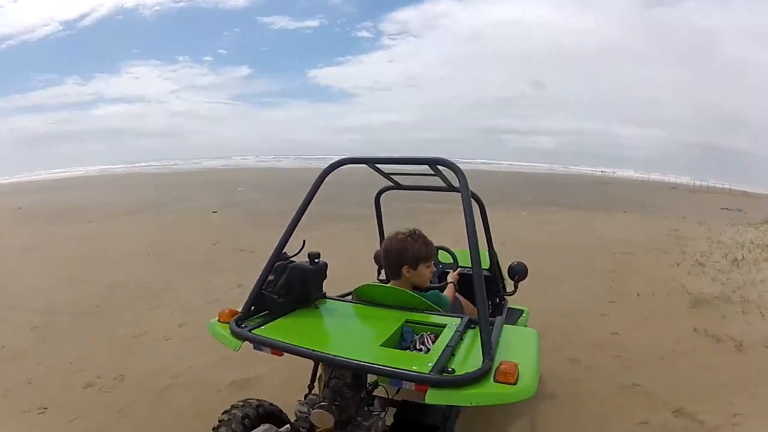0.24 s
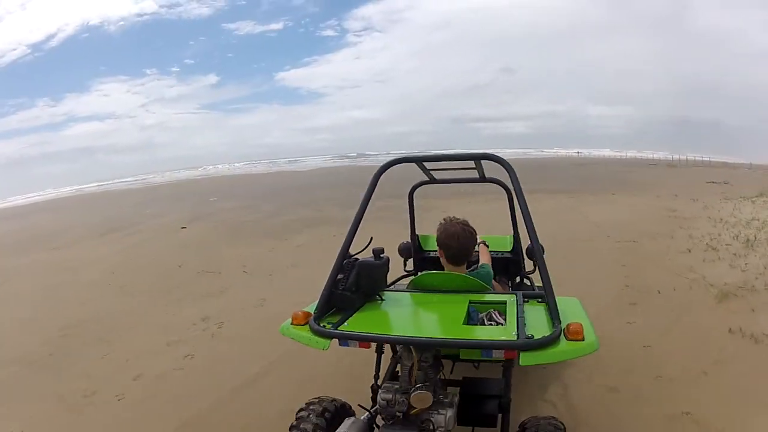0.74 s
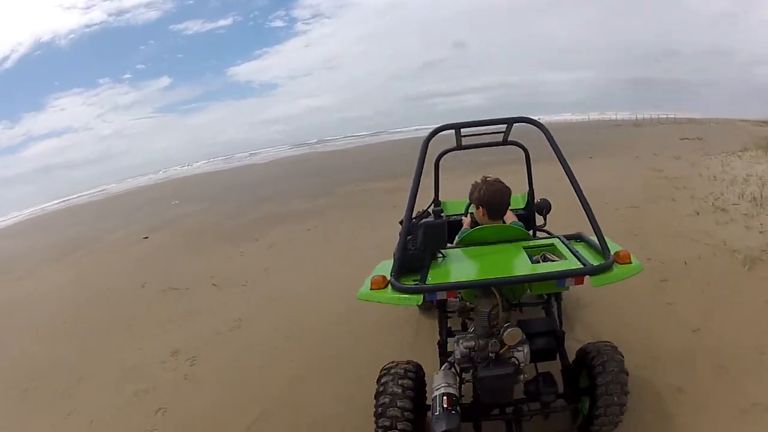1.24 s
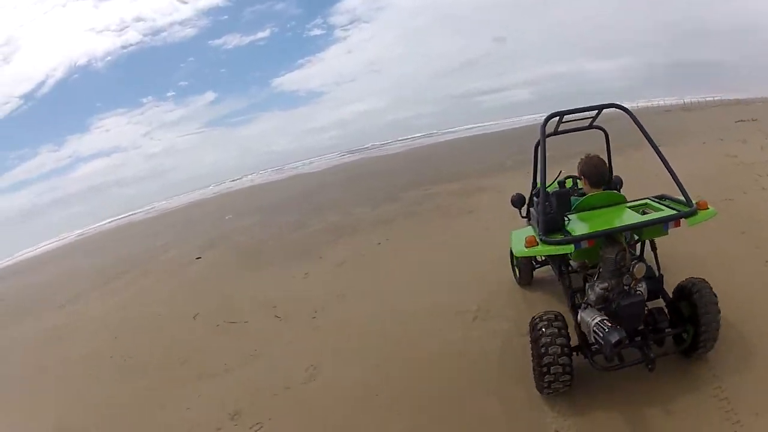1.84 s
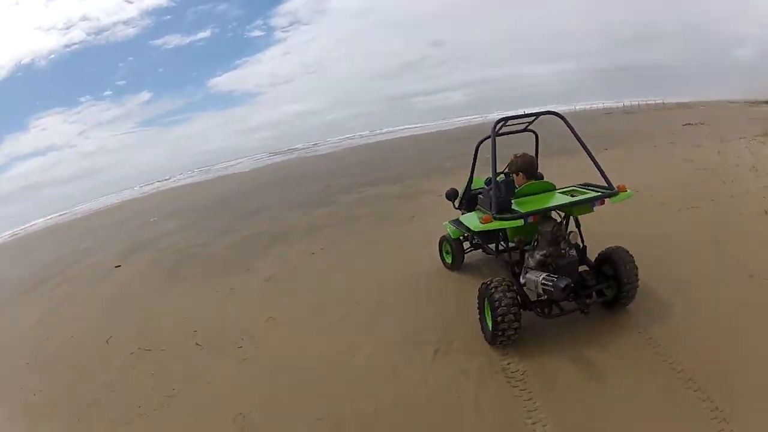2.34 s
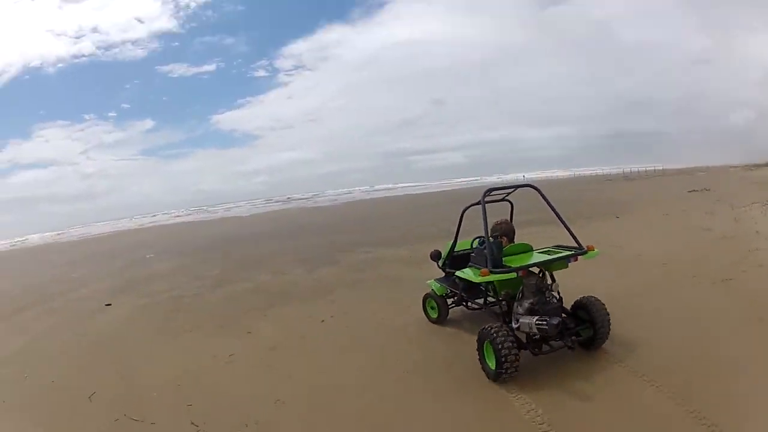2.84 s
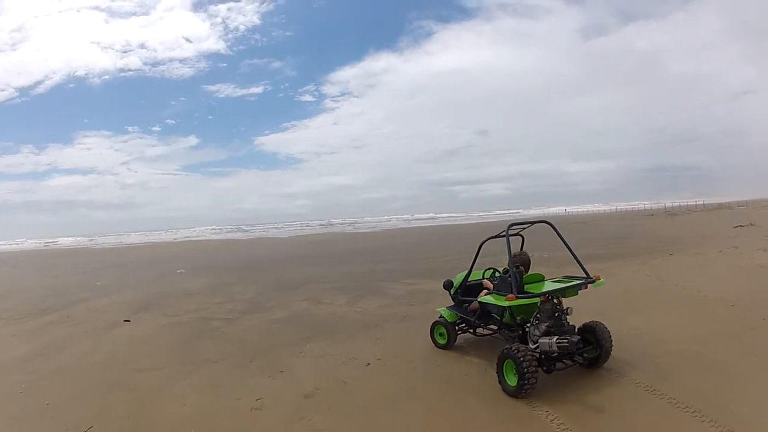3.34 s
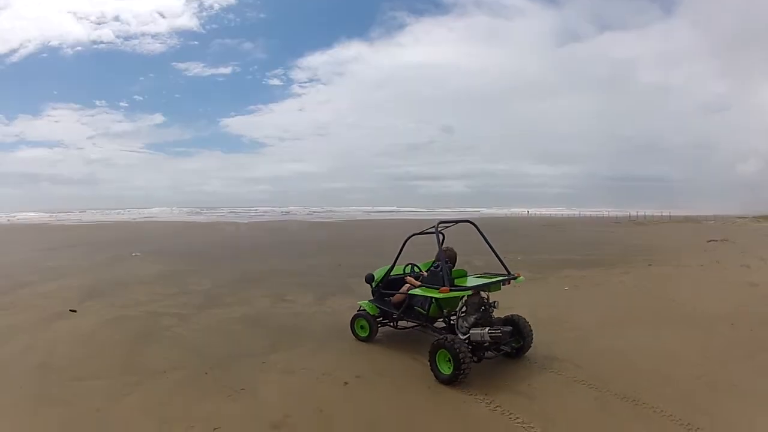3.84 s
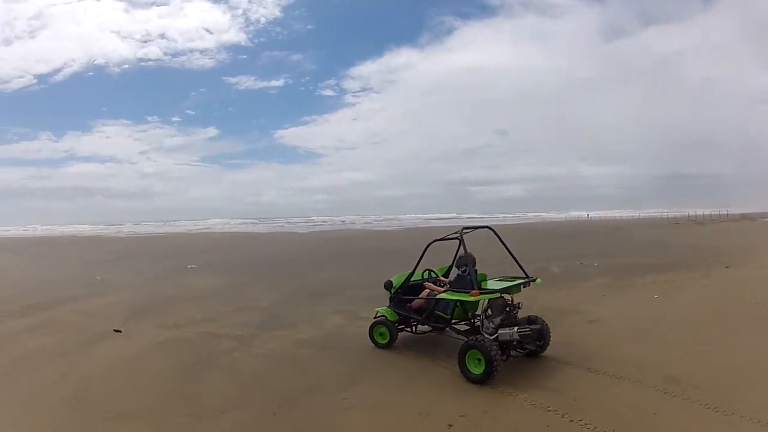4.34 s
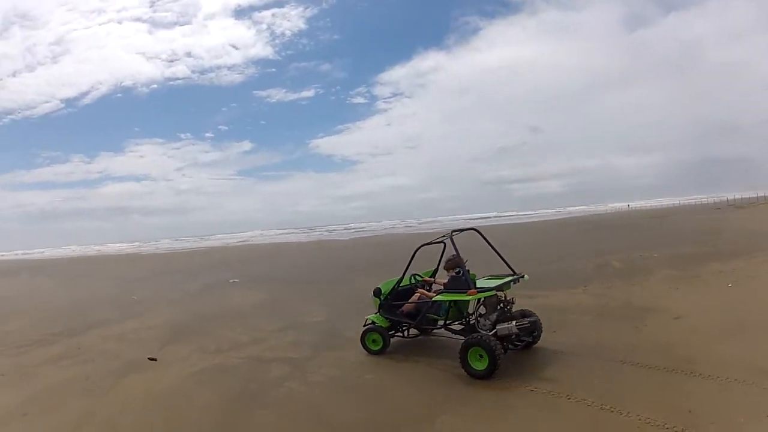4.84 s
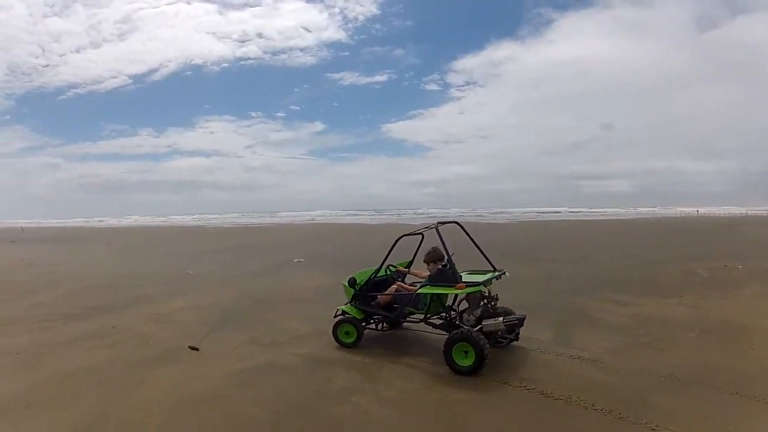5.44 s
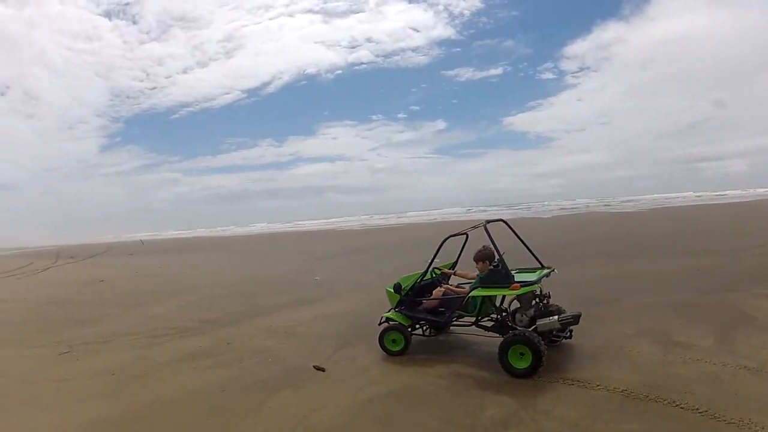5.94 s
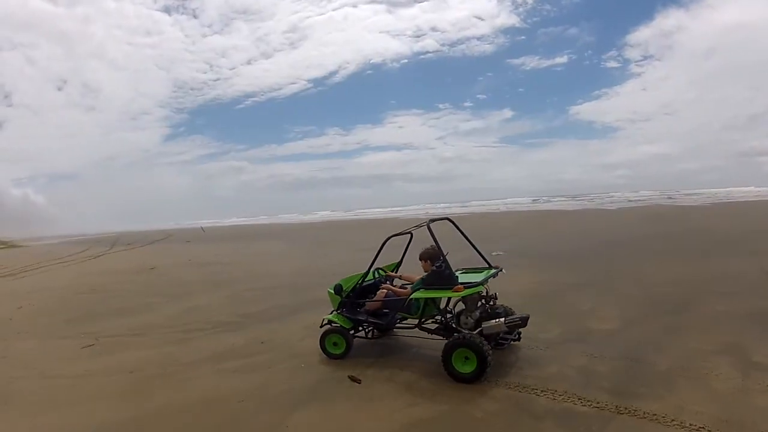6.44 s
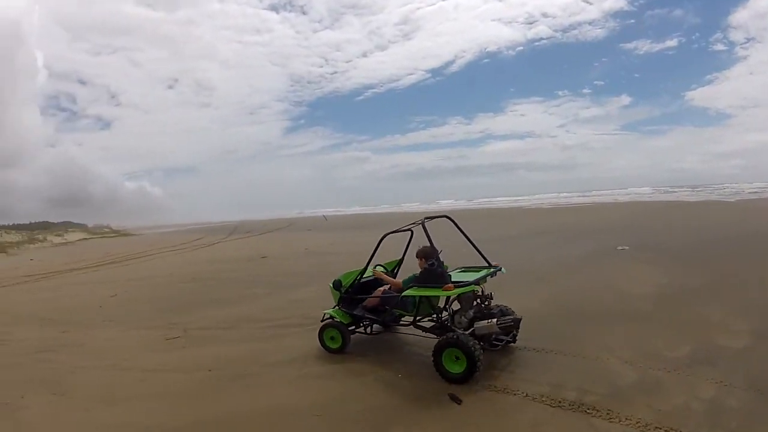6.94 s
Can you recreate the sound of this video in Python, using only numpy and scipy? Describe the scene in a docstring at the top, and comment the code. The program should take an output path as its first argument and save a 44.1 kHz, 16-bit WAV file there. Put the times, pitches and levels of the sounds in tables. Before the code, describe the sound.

A one-cylinder buggy engine thumps and rattles, speeding up as it draws away, with close handling clacks and wind rumble.

```python
"""A small one-cylinder four-stroke engine pulls a buggy slowly over wet sand.
Each firing thumps through the silencer with a rasp of gas, and the valves rattle in step.
The engine eases off, then gathers speed and turns side-on, over wind and faint surf and tyres.
A hand shifts on the mount of a boxed-in camera that follows: knocks, rubs, pings and dull shoves.
The recorder holds each coarse sample, which adds a gritty top."""
import sys
import numpy as np
from scipy import signal
from scipy.fft import rfft, irfft
from scipy.io import wavfile
from scipy.ndimage import uniform_filter1d

SR = 44100
rng = np.random.default_rng(int(sys.argv[2]) if len(sys.argv) > 2 else 0)


def wav_record(signal):
    """Record a signal, one row per channel, as 16-bit PCM in the file named by sys.argv[1]."""
    frames = np.transpose(np.atleast_2d(signal))
    bounded = np.clip(frames, -1, 1)
    # unit amplitude maps onto the largest positive 16-bit level
    quanta = np.round(bounded * 32767).astype(np.int16)
    wavfile.write(sys.argv[1], SR, quanta)


N = 317520  # 7.2 s


def undb(db):
    """Turn decibels into a gain."""
    return 10 ** (np.asarray(db) / 20)


def unit(x):
    """Scale to an average (rms) level of 1."""
    return x / np.sqrt(np.mean(x ** 2) + 1e-20)


def curves(table):
    """Join each column's points with straight lines in time."""
    times, *columns = np.transpose(table)
    return [np.interp(np.arange(N) / SR, times, column) for column in columns]


def noise(colour):
    """Noise with the given balance of low and high pitches."""
    hz, db = np.transpose(colour)
    bins_hz = np.maximum(np.arange(N // 2 + 1) * SR / N, 1)
    gain = undb(np.interp(np.log(bins_hz), np.log(hz), db))
    return unit(irfft(rfft(rng.standard_normal(N)) * gain, N))


def band(x, low_hz, high_hz, order):
    """Keep what lies between two pitches."""
    return signal.sosfilt(signal.butter(order, [low_hz, high_hz], "band", fs=SR, output="sos"), x)


def resonate(x, hz, width_hz):
    """Let a sound ring at one pitch."""
    return signal.lfilter(*signal.iirpeak(hz, hz / width_hz, fs=SR), x)


def body(x, tones, order=1):
    """Let a sound ring at several pitches; a higher order lets less through between them."""
    out = 0
    for hz, width_hz, db in tones:
        rung = x
        for _ in range(order):
            rung = resonate(rung, hz, width_hz)
        out = out + undb(db) * rung
    return unit(out)


def ring(t, hz, fade_s):
    """A struck note that falls by 60 dB in fade_s."""
    return np.sin(2 * np.pi * hz * t) * np.exp(-np.log(1000) * t / fade_s)


def add(out, start_s, sound):
    """Mix a sound in at start_s."""
    i = int(start_s * SR)
    out[i:i + len(sound)] += sound[:N - i]


def facing(x, side, rear_tones, side_tones):
    """Blend from the tones heard from behind (side = 0) to those heard side-on (side = 1)."""
    return np.sqrt(1 - side ** 2) * body(x, rear_tones, order=2) + side * body(x, side_tones)


def once_a_cycle(phase, at):
    """A click each time the engine's cycle (phase, 0 to 1) passes a given point."""
    return 1. * (np.diff((phase > at) * 1., prepend=1.) > 0)


def exhaust_thump(pulses, side, pipe_db=-7, overtone_db=-21, bark_db=-16):
    """The silencer turns each firing into a thump, a little higher side-on; the pipe rings on."""
    from_rear = unit(band(pulses, 82, 147.5, order=3))
    from_side = unit(band(pulses, 84, 163.6, order=4))
    thump = from_rear * (1 - side) + from_side * side
    pipe = unit(resonate(thump, hz=180, width_hz=17)) * (.5 + .5 * side)
    overtone = unit(band(pulses, 237.7, 296, order=2))
    # a double bark, 12 ms apart, loudest in line with the tailpipe
    doubled = pulses + undb(-6) * np.roll(pulses, int(.012 * SR))
    bark = unit(band(doubled, 290, 440, order=2)) * (1 - side)
    return -unit(thump + undb(pipe_db) * pipe + undb(overtone_db) * overtone + undb(bark_db) * bark)


# Exhaust tones from behind and from the side: pitch_hz, width_hz, level_db
RASP_REAR_TONES = [(395, 200, -3), (867, 78, -7), (1632, 270, 3)]
RASP_SIDE_TONES = [(588, 150, 4.5), (1190, 186, 5.5), (1660, 47, 6), (2233, 38, 9.5)]


def exhaust_rasp(phase, side, strength, between_puffs=.28, clack_db=-5):
    """A puff of gas with a clack at its heart, later in the cycle as the buggy turns side-on."""
    puff_at = .08 + .36 * side
    puff = between_puffs + np.exp(-((phase - puff_at) / .09) ** 2)
    hiss = unit(puff * rng.standard_normal(N))
    clack = undb(clack_db) * unit(once_a_cycle(phase, puff_at))
    return facing(strength * (hiss + clack), side, RASP_REAR_TONES, RASP_SIDE_TONES)


# Bursts of valve noise in each cycle: position_cycles, width_cycles, rear_gain, side_gain
VALVE_BURSTS = [(.41, .06, .8, .6), (.71, .05, 1.0, .3), (.95, .07, .3, .4)]
# The metal's tones from behind and from the side: pitch_hz, width_hz, level_db
METAL_REAR_TONES = [(870, 92, -13.5), (1380, 320, -25), (1804, 1050, -11.5), (2540, 346, 0),
                    (3215, 480, -11.5)]
METAL_SIDE_TONES = [(853, 83, 1), (1617, 78, -2.5), (2168, 210, 2.5), (2658, 225, 5), (3157, 19, 8.5)]


def valve_rattle(phase, side):
    """Chain and valve noise swells at set points of the cycle and rings the engine's metal."""
    swell = 1.0
    for at, width, rear_gain, side_gain in VALVE_BURSTS:
        away = (phase - at + .5) % 1 - .5
        swell = swell + np.exp(-(away / width) ** 2) * (rear_gain * (1 - side) + side_gain * side)
    return facing(swell * rng.standard_normal(N), side, METAL_REAR_TONES, METAL_SIDE_TONES)


def tappet_ticks(phase, scatter_db=3):
    """Once a cycle a tappet (a valve's pusher) lands, harder or softer, and rings the valve cover."""
    cover = ring(np.arange(SR // 10) / SR, hz=2600, fade_s=.028)
    blows = once_a_cycle(phase, at=.69) * undb(scatter_db * rng.standard_normal(N))
    return unit(signal.fftconvolve(blows, cover)[:N])


# How fast the engine runs: time_s, firings_per_s
ENGINE_SPEED = [(0.0, 15.27), (0.22, 15.1), (0.68, 13.41), (0.99, 12.95), (1.83, 16.27), (3.39, 19.31),
                (4.55, 20.7), (5.47, 22.26), (6.47, 22.48), (6.79, 23.14), (7.2, 22.27)]
# The driver eases off, then opens up again: time_s, throttle_0_to_1
THROTTLE = [(0, 0.27), (.5, 0), (1.0, 0.46), (1.12, .9), (3.0, 1), (4.5, 0.66), (6.2, 0.54), (6.8, 0.72),
            (7.2, 0.5)]
# The buggy draws away and turns: time_s, distance_m, side_on_0_to_1
BUGGY_PATH = [(0, 1.04, 0.52), (1.4, 1.9, 0.06), (2.0, 2.48, 0.7), (3.5, 4.08, 1), (5.0, 3.5, 0.99),
              (7.2, 2.83, 0.9)]


def engine(cruise_hz=15, scatter_db=.7, tappet_db=-3):
    """One firing a cycle, each a little uneven, drives the thump, the rasp and the rattle."""
    rate, = curves(ENGINE_SPEED)
    throttle, = curves(THROTTLE)
    distance_m, side = curves(BUGGY_PATH)

    def gain(db, shut_db, doubling_db):
        """Start from db (1 m, full throttle, cruising); adjust for throttle, speed and distance."""
        return undb(db + shut_db * (1 - throttle) + doubling_db * np.log2(rate / cruise_hz)) / distance_m

    cycles = .745 + np.cumsum(rate) / SR
    firing, phase = cycles.astype(int), cycles % 1
    strength = undb(scatter_db * rng.standard_normal(firing[-1] + 1))[firing]
    pulses = np.diff(firing, prepend=0) * strength / np.sqrt(rate)
    thump = exhaust_thump(pulses, side)
    rasp = exhaust_rasp(phase, side, strength)
    rattle = valve_rattle(phase, side)
    # the tappets stand out under load and from behind
    rattle += undb(tappet_db) * throttle * (1 - side) * tappet_ticks(phase)
    return (thump * gain(-30.5, shut_db=-8.7, doubling_db=6.15)
            + rasp * gain(-48, shut_db=-8.8, doubling_db=.9)
            + rattle * gain(-43.5, shut_db=-6.1, doubling_db=3.14))


# How strong the wind is: time_s, level_db
WIND_LEVEL = [(0, -45.5), (1.8, -45), (3.1, -44), (4.2, -47.5), (5.6, -55.5), (7.2, -49)]
# The wind's deep tone: pitch_hz, level_db
WIND_COLOUR = [(12, -25), (25, -0.5), (45, -2), (70, -2), (130, 3), (300, -27)]


def wind():
    """Wind rumbles on the camera, slowly rising and falling."""
    level_db, = curves(WIND_LEVEL)
    return undb(level_db) * noise(WIND_COLOUR)


# The tone of surf and tyres: pitch_hz, level_db
SURF_COLOUR = [(20, -20), (60, -8), (200, 10), (400, 3), (620, -4.5), (880, -5), (1020, -13), (1200, -10),
               (2200, -7), (3900, -45)]


def surf_and_tyres(level_db=-60):
    """Surf and tyres blend into one faint, steady wash."""
    return undb(level_db) * noise(SURF_COLOUR)


def through_mount(x, top_hz=270):
    """The camera mount passes on only the low part of a shake."""
    return signal.sosfilt(signal.butter(4, top_hz, fs=SR, output="sos"), x)


# The notes of the camera's case: pitch_hz, fade_s, level_db
CASE_TONES = [(554, 0.011, 9.5), (869, 0.03, 0.5), (1086, 0.016, -5), (1583, 0.01, -6), (1827, 0.0061, 6),
              (2032, 0.056, -17), (2485, 0.017, 1), (3517, 0.025, 2), (3756, 0.017, 2)]
# Blows on the case: start_s, level_db, contact_hz, spread_octaves, scuff_s, thump_db
KNOCKS = [(.350, -29.5, 625, 0.65, 0.0039, -32), (.782, -23, 1260, 0.79, .011, -55),
          (1.929, -17, 1460, 1.4, 0.02, -16), (2.138, -8.5, 920, 0.77, 0.0048, -36),
          (2.2524, -5, 1720, 0.51, 0.0035, -16), (2.3935, 5.5, 756, 3.8, 0.0019, -13.5),
          (2.585, -19, 1700, 1.9, 0.0089, -36), (2.751, -3.5, 1300, .95, 0.0071, -24),
          (2.763, -13, 1710, 0.61, .006, -18.5), (2.957, -16, 2120, 0.51, 0.0068, -54),
          (3.062, -16, 1060, 1.5, 0.015, -20.5), (3.090, -15.5, 1450, 0.52, 0.0092, -19.5),
          (3.511, -28, 590, 0.11, 0.0055, -40), (3.9405, -18.5, 1980, 0.61, .0022, -24),
          (4.266, -2.5, 1480, 0.98, .0052, -19.5), (4.380, -16, 2370, .29, 0.0016, -35)]


def knocks(scuff_db=-7, scuff_widening=1.55, graze_lead_s=.004, graze_db=-25.5, press_s=.000096):
    """Each blow rings the case, scuffs it and shakes the mount; harder contact favours higher notes."""
    out, mount = np.zeros(N), np.zeros(N)
    t = np.arange(SR // 3) / SR
    shell = signal.butter(6, 570, "high", fs=SR, output="sos")  # a small stiff shell gives no bass
    press = 1 - np.exp(-t / press_s)  # the contact takes a moment to build
    sway = ring(t, hz=148, fade_s=.069) + undb(-9) * ring(t, hz=212, fade_s=.069)
    for start_s, level_db, contact_hz, spread, scuff_s, thump_db in KNOCKS:
        notes = press * sum(undb(db) * np.exp(-(np.log2(hz / contact_hz) / spread) ** 2)
                            * ring(t, hz, fade_s) for hz, fade_s, db in CASE_TONES)
        scuff_band = [(contact_hz, scuff_widening * spread * contact_hz, 0)]
        scrapes = body(rng.standard_normal((2, len(t))), scuff_band, order=2)
        scuff, graze = press * scrapes * np.exp(-t / scuff_s)
        clack = notes / np.abs(notes).max() + undb(scuff_db) * scuff / np.abs(scuff).max()
        graze = signal.sosfilt(shell, graze / np.abs(graze).max())  # a light touch before the blow
        add(out, start_s - graze_lead_s, undb(level_db + graze_db) * graze)
        add(out, start_s, undb(level_db) * signal.sosfilt(shell, clack))
        add(mount, start_s, -undb(thump_db) * sway)
    return out + through_mount(mount)


# Finger strokes on the mount: start_s, length_s, level_db, hollow_hz
RUBS = [(0.395, 0.19, -50, 513), (0.706, 0.14, -44, 905), (2.011, 0.16, -30, 1260),
        (2.152, 0.17, -35, 1770), (2.219, 0.17, -34.5, 896), (2.392, 0.14, -35.5, 835),
        (2.509, 0.087, -33.5, 1030), (2.846, 0.21, -34.5, 1110), (3.382, 0.17, -50.5, 2460),
        (7.028, 0.083, -48.5, 880)]
# The tone of rubbing skin: pitch_hz, level_db
RUB_COLOUR = [(100, -25), (230, 1), (380, -8.5), (550, -2.5), (720, -6.5), (880, -1.5), (1050, -11.5),
              (1400, -3.5), (1750, 1), (2250, -4.5), (2650, 1.5), (2980, -20), (3400, 3), (3900, -15)]


def rubbing(catch_db=1, slip_db=3, hollow_db=-5, shake_db=-1.5, rise_share=.34, fall_share=.45):
    """Skin catches and slips in grainy strokes that shake the camera; each grip has a hollow note."""
    out, t = 0, np.arange(N) / SR
    catches = catch_db * unit(uniform_filter1d(rng.standard_normal(N), size=70))
    slips = slip_db * unit(uniform_filter1d(rng.standard_normal(N), size=500))
    friction = unit(undb(catches + slips) * noise(RUB_COLOUR))
    shake = undb(shake_db) * unit(band(rng.standard_normal(N), 20, 65, order=2))
    for start_s, length_s, level_db, hollow_hz in RUBS:
        along = (t - start_s) / length_s
        stroke = np.clip(np.minimum(along / rise_share, (1 - along) / fall_share), 0, 1)
        hollow = undb(hollow_db) * unit(resonate(friction, hollow_hz, width_hz=170))
        out = out + undb(level_db) * stroke * (unit(friction + hollow) + shake)
    return out


# Pings from the mount's joint: start_s, pitch_hz, level_db
PINGS = [(1.929, 552, -38), (2.081, 518, -29.5), (2.3935, 612, -22), (2.748, 668, -43), (3.062, 782, -30.5),
         (3.511, 586, -50)]


def joint_pings(fade_s=.23):
    """The mount's joint rings with one short note each time it gives."""
    out, t = np.zeros(N), np.arange(SR // 3) / SR
    for start_s, pitch_hz, level_db in PINGS:
        add(out, start_s, undb(level_db) * ring(t, pitch_hz, fade_s))
    return out


# Pushes on the mount: start_s, level_db
SHOVES = [(2.146, -16), (2.256, -31), (2.592, -20), (2.764, -11), (3.065, -20), (3.493, -27), (7.038, -22)]


def shoves(rise_s=.001):
    """The hand shoves the mount, which wobbles with a deep, dull thud."""
    out, t = np.zeros(N), np.arange(SR // 3) / SR
    thud = ring(t, hz=59.4, fade_s=.064) * (1 - np.exp(-t / rise_s))
    for start_s, level_db in SHOVES:
        add(out, start_s, -undb(level_db) * thud)
    return through_mount(out)


def scene():
    """Engine, hand noises, wind and surf reach one microphone, the same left and right."""
    mono = engine() + knocks() + rubbing() + joint_pings() + shoves() + wind() + surf_and_tyres()
    return np.array([mono, mono])


def record(dry, edge_hz=3750, top_hz=15300):
    """The recorder samples at 8 kHz and holds each value, which mirrors the sound into the treble."""
    narrow = signal.sosfiltfilt(signal.butter(8, edge_hz, fs=SR, output="sos"), dry)
    coarse = signal.resample_poly(narrow, 80, 441, axis=1, window=("kaiser", 3))  # down to 8 kHz
    held = np.repeat(np.clip(coarse, -1, 1), 6, axis=1)  # stair steps at 48 kHz
    gritty = signal.resample_poly(held, 147, 160, axis=1)[:, :N]  # back to SR
    return signal.sosfilt(signal.ellip(8, .2, 70, top_hz, fs=SR, output="sos"), gritty)


dry = scene()
out = record(dry)
wav_record(out)
```